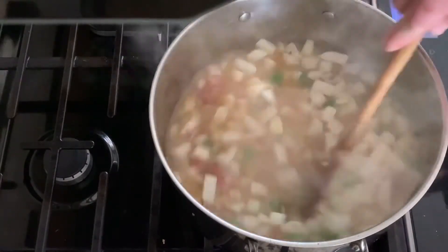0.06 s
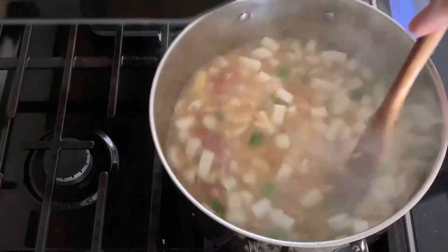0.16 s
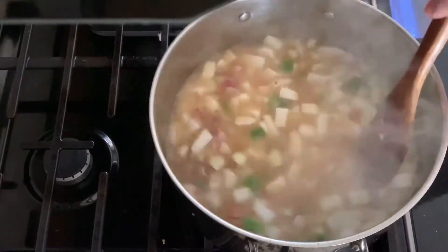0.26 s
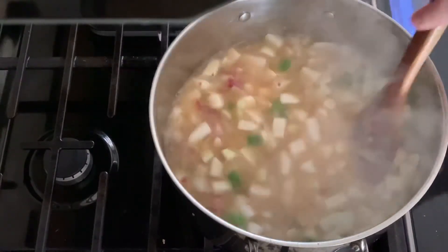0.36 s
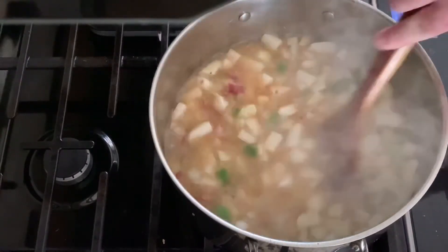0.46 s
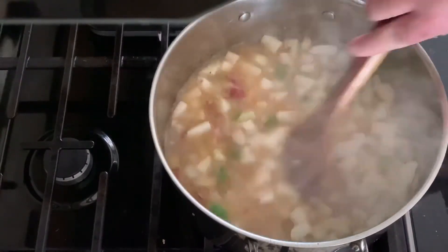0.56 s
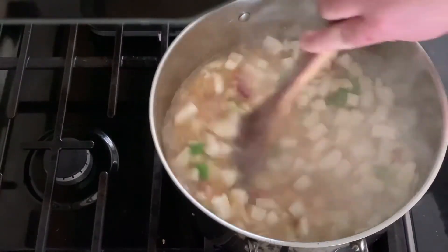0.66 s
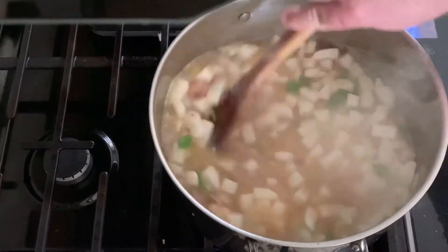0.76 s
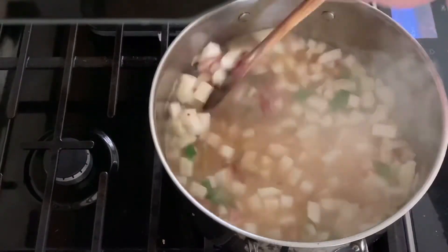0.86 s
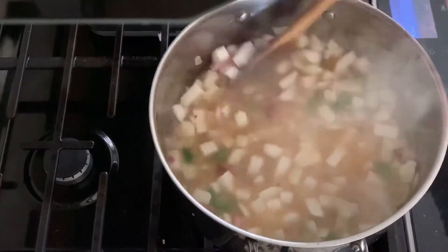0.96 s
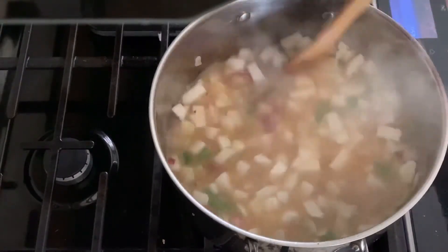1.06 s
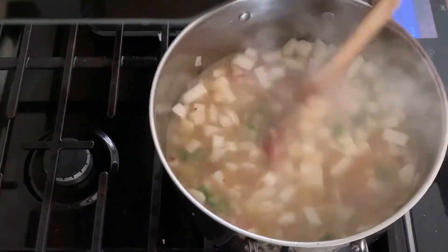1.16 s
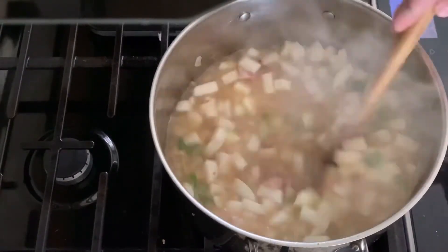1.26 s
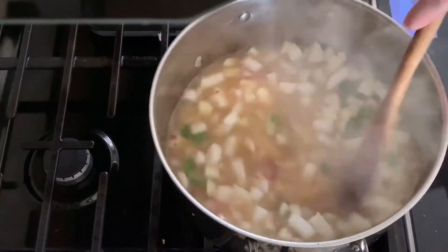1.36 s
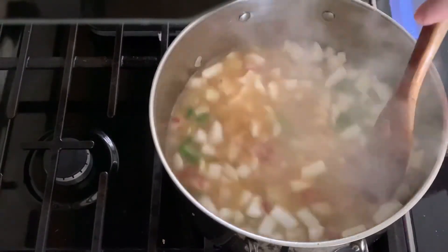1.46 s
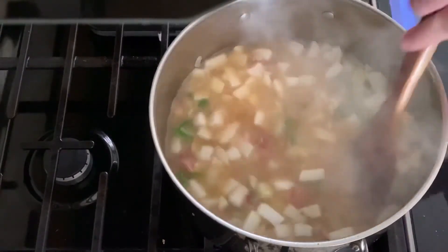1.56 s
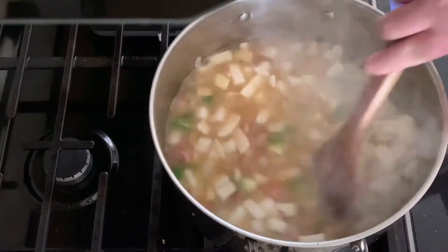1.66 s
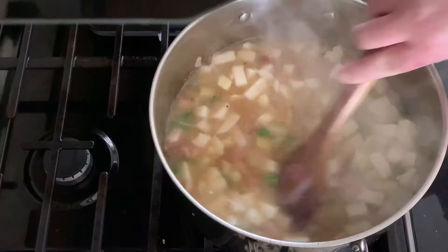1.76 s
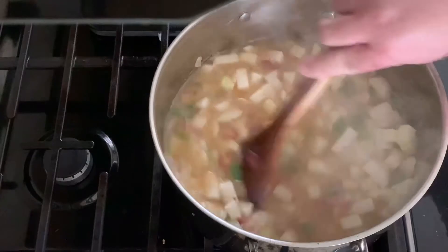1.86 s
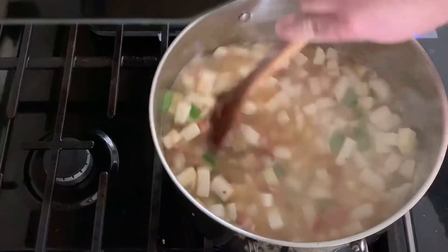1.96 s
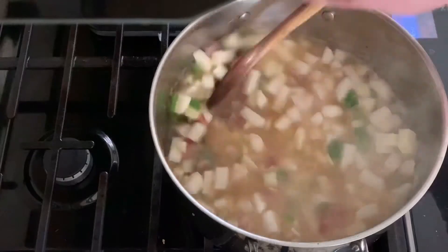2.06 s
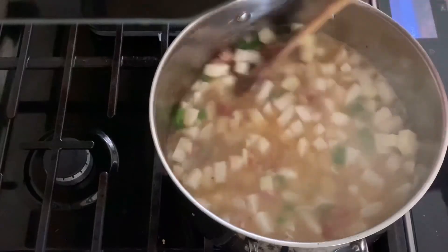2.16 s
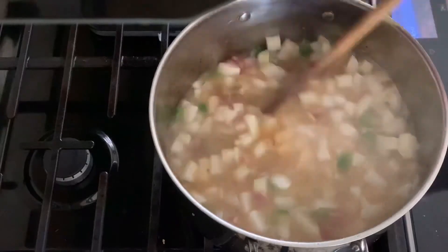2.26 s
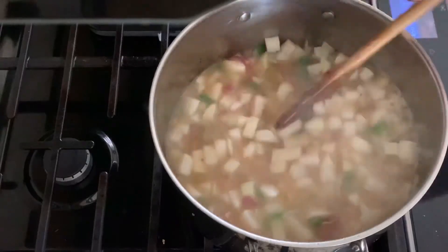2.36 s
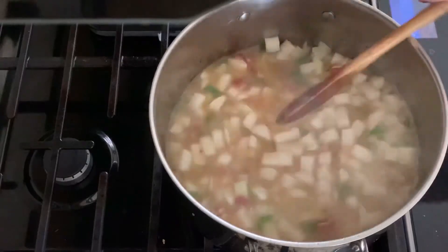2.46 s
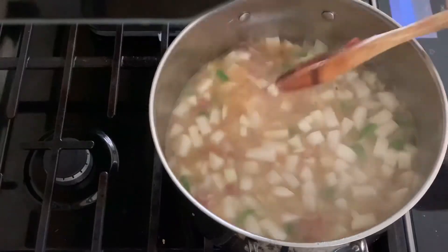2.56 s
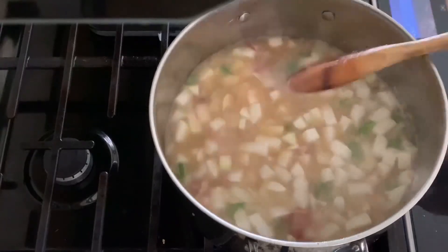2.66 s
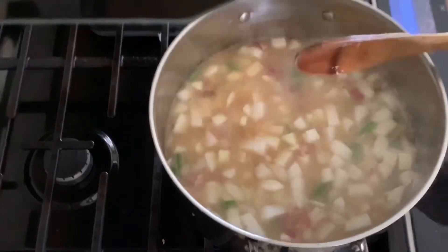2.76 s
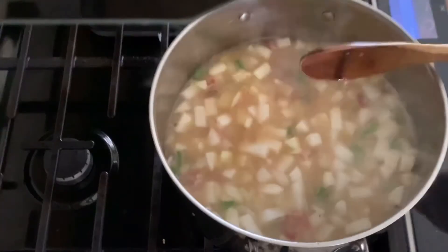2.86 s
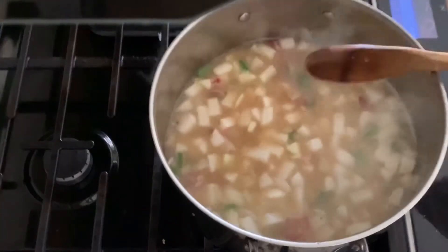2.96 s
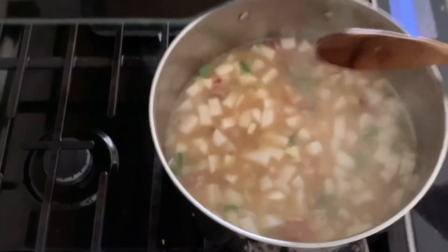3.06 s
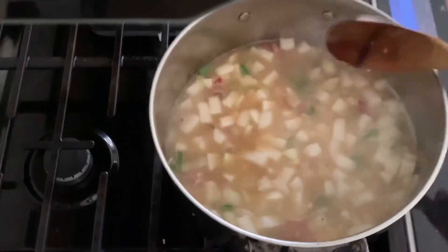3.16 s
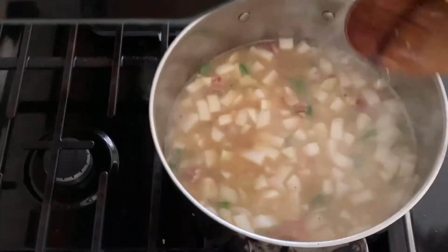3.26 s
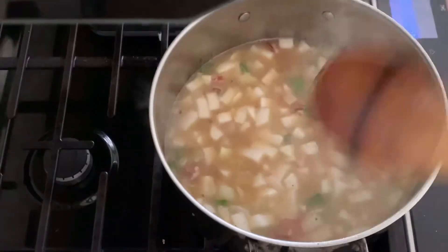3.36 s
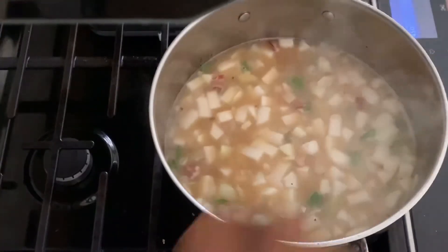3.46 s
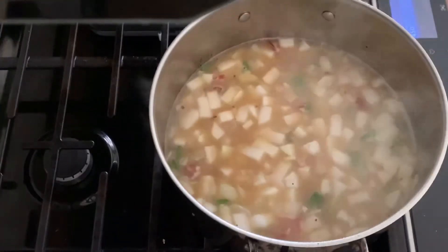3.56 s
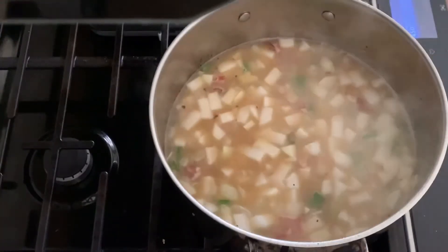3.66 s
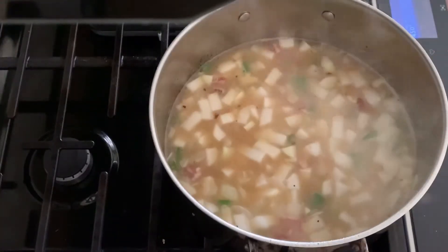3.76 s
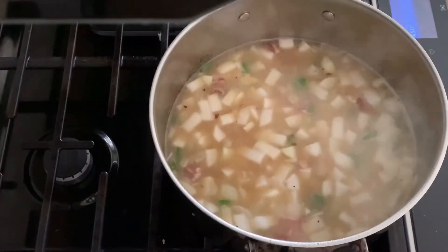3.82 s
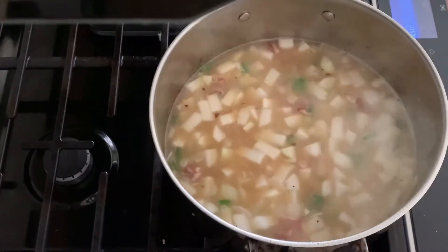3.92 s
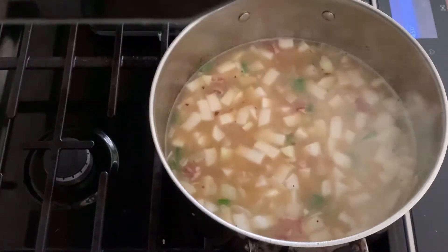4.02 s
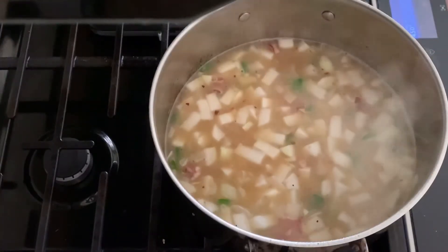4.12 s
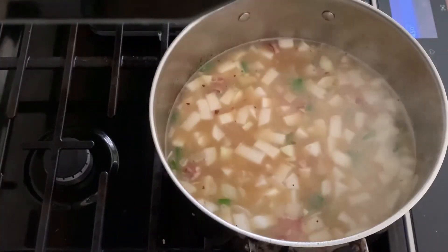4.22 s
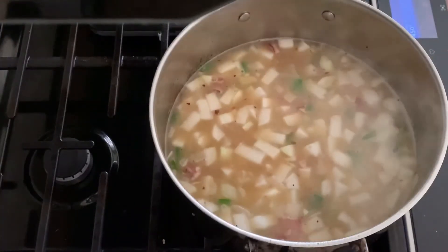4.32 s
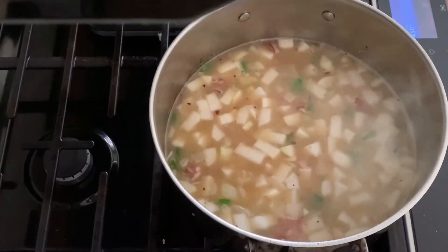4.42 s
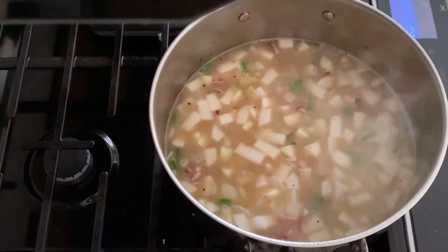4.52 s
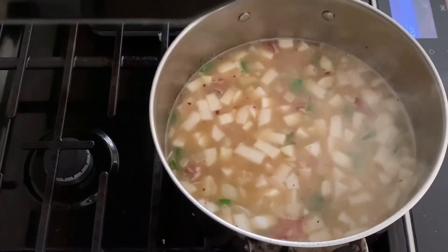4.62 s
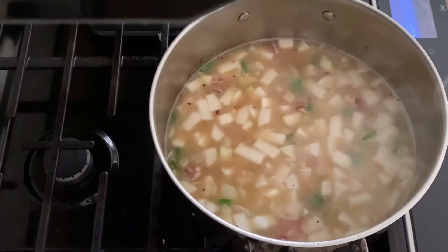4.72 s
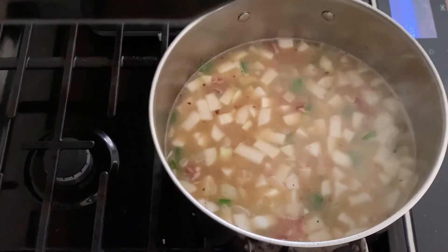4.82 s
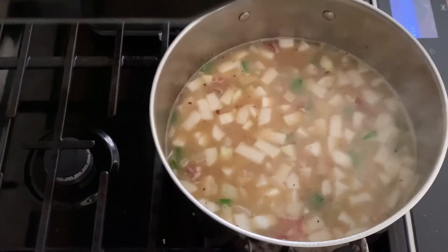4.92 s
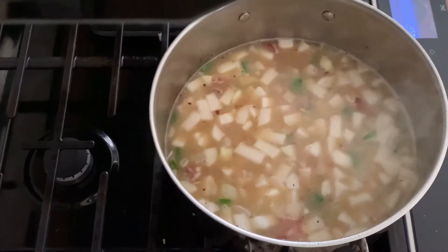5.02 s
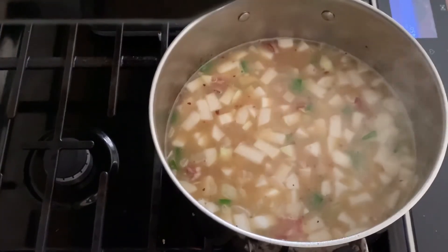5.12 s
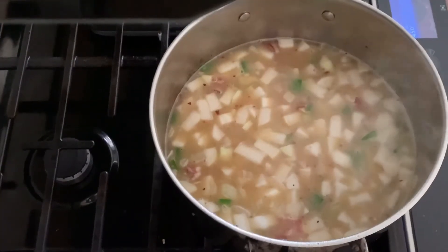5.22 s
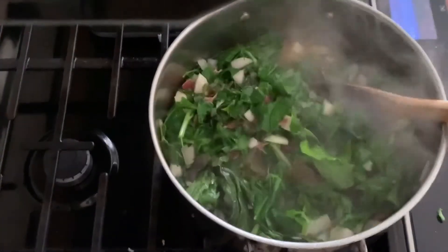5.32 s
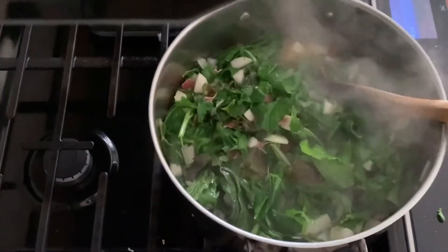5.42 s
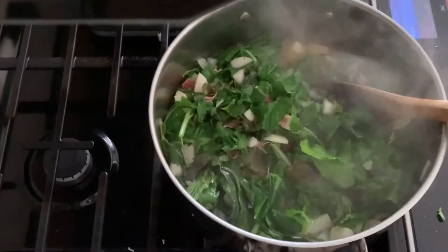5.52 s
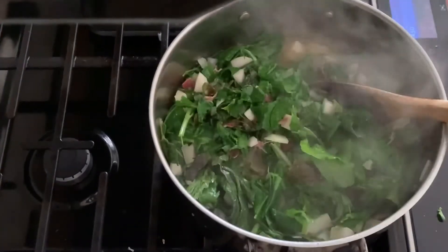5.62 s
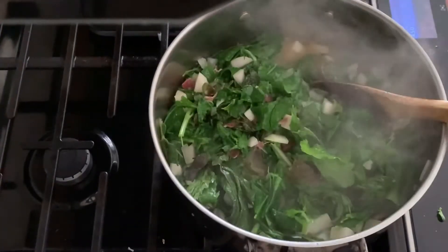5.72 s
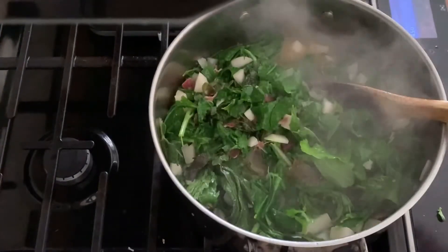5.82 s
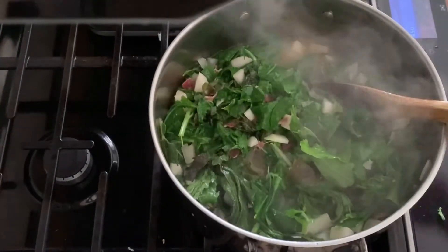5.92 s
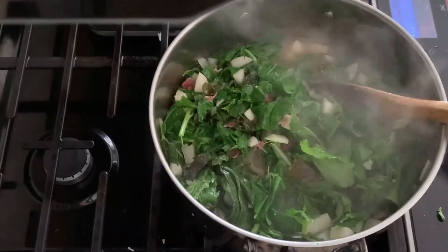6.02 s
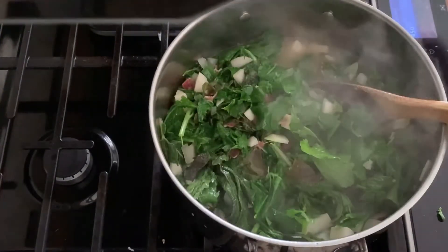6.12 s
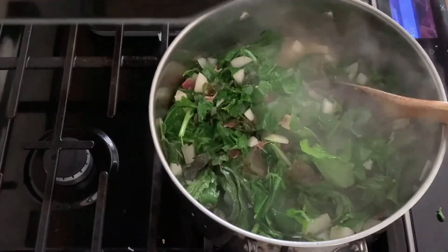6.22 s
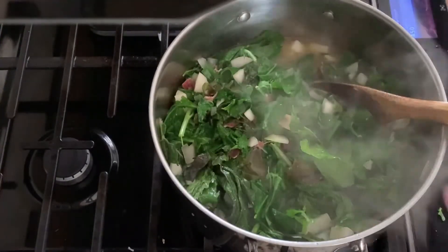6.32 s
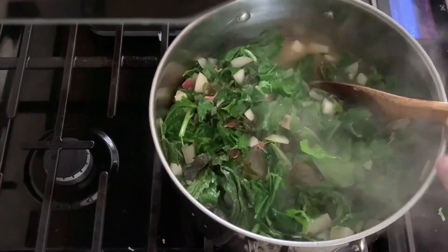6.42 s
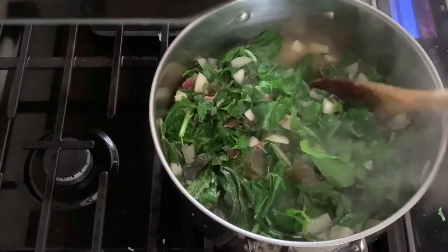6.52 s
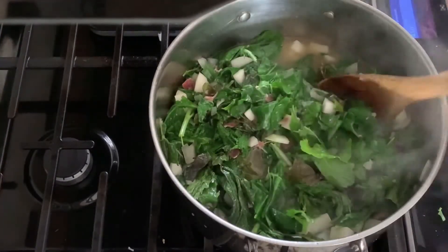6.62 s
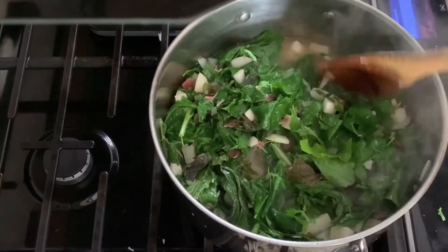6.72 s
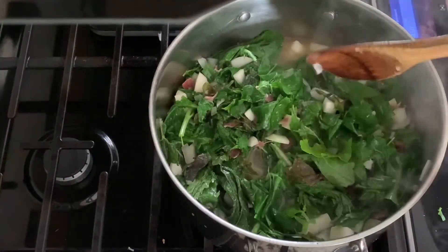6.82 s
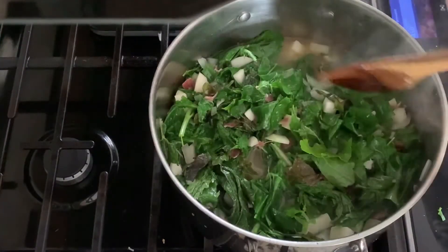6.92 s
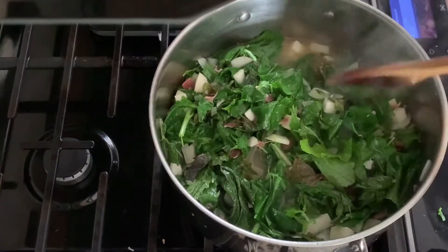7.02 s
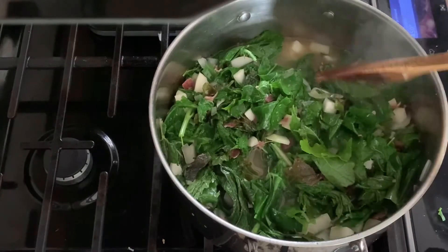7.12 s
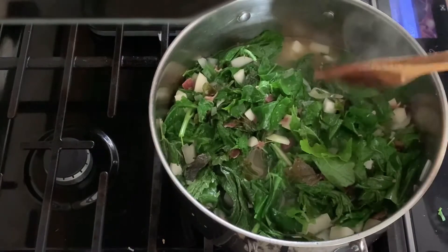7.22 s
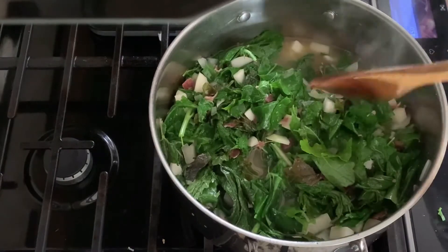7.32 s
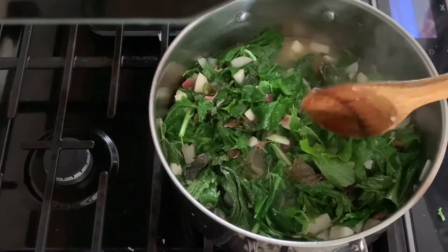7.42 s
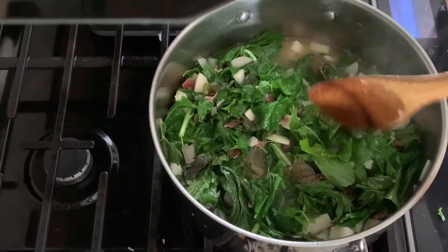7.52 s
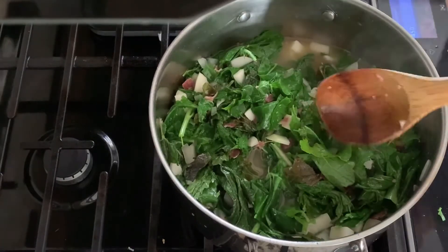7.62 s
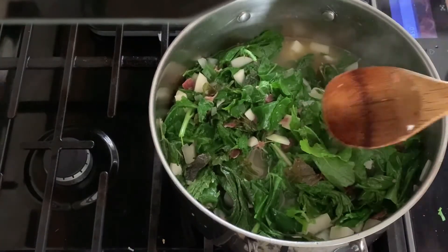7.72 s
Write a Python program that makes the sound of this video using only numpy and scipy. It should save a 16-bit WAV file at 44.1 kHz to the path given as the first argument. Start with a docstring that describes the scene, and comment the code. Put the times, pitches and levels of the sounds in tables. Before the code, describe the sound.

A small home kitchen is heard close to the stove, in stereo with little reverberation. A steady, low-heavy extractor-fan rush runs with soft bubbling, airy steam hiss and a thin, faint high whistle that slowly strengthens. A soft wet knock comes at 0.3 s, a short gritty spoon scrape at 0.7, a clearer wooden clack on the pot wall at 1.5, and a longer scrape at 1.9, with tiny spits between. From 2.6 to 3.05 s the handle raps the rim in four main blows, at 2.6, 2.75, 2.9 and 3.0; the steel pot rocks and rattles dully. At 3.84 the spoon touches a thin metal rest, then clatters brightly at 4.0 with a faint ring. Low muffled bumps follow at 4.45, 4.75 and 4.9. At 5.15 everything stops, almost silent for a tenth of a second, then fan and sizzle fade in slightly quieter; the whistle vanishes by 6.5, leaving faint fizz and spits until about 7.8.

```python
"""Stew stirred in a steel pot

Under a humming extractor fan (shaped noise) a stew simmers (ringing bubbles), hisses and spits (noise).
A wooden spoon scrapes the bottom (dense grains) and knocks the wall (damped modes). It is tapped clean
on the rim and dropped on a metal rest: struck modes plus a chatter of contacts; dull low bumps follow.
The sound stops short, nearly silent for a moment, and fades in again a little quieter."""
import sys
import numpy as np
from scipy import signal
from scipy.fft import rfft, irfft, next_fast_len
from scipy.io import wavfile

SR = 44100
rng = np.random.default_rng(int(sys.argv[2]) if len(sys.argv) > 2 else 0)


def file_out(sig):
    """Save sig as 16-bit WAV at sys.argv[1]."""
    # one column per channel
    cols = np.atleast_2d(sig).T
    # limit, then scale
    lim = np.clip(cols, -1, 1)
    pcm = np.round(lim * 32767).astype(np.int16)
    wavfile.write(sys.argv[1], SR, pcm)


N = 343098
T = np.arange(N) / SR
PADDED = next_fast_len(N)
HZ = np.maximum(np.fft.rfftfreq(PADDED, 1 / SR), 1)
BREAK_S = 5.15


def from_db(db):
    """Decibels to gain."""
    return 10 ** (np.asarray(db) / 20)


def rms_one(x):
    """Scale to rms 1."""
    return x / np.sqrt(np.mean(x ** 2) + 1e-20)


def in_time(rows):
    """A (s, dB) table as gain at every sample."""
    return from_db(np.interp(T, *np.transpose(rows)))


def at_hz(rows, hz):
    """Every column of a table read on a log-frequency axis."""
    at, *columns = np.transpose(rows)
    return [np.interp(np.log(hz), np.log(at), column) for column in columns]


def outside(start_s, stop_s):
    """Seconds away from a span of time, zero within it."""
    return np.maximum(np.maximum(start_s - T, T - stop_s), 0)


def drift(rate_hz):
    """Slow random wander of spread 1: noise through a two-pole lowpass, at a fortieth of SR."""
    r = np.exp(-80 * np.pi * rate_hz / SR)
    noise = rng.standard_normal(N // 40 + 2002)
    slow = signal.lfilter([1], [1, -2 * r, r * r], noise)[2000:]
    return np.interp(np.arange(N) / 40, np.arange(len(slow)), rms_one(slow))


def coloured(source, colour, peaks=()):
    """Shape a pair of signals by a spectrum and some resonant lifts; rms 1."""
    db = at_hz(colour, HZ)[0]
    for hz, width_hz, lift_db in peaks:
        db = db + lift_db / (1 + (2 * (HZ - hz) / width_hz) ** 2)
    return rms_one(irfft(rfft(source, PADDED) * from_db(db), PADDED)[:, :N])


def grains(per_s, spread_db):
    """Two unrelated streams of random clicks of uneven size; rms 1."""
    sizes = from_db(spread_db * np.minimum(rng.exponential(1, (2, N)), 4))
    signed = sizes * rng.choice([-1, 1], (2, N))
    return rms_one(signed * (rng.random((2, N)) < per_s / SR))


def ring(clicks, hz, t60_s):
    """Two-pole resonator: a unit click sets a sine of height 1 ringing."""
    r, w = from_db(-60 / (t60_s * SR)), 2 * np.pi * hz / SR
    return signal.lfilter([0, np.sin(w)], [1, -2 * r * np.cos(w), r * r], clicks + 1e-18)


def clicks_at(rows):
    """One click per row, at its start and level (first two columns)."""
    out = np.full(N, 1e-18)
    out[[round(row[0] * SR) for row in rows]] = from_db([row[1] for row in rows])
    return out


TWIN_SPLIT, TWIN_DB = .004, -8   # largest pitch share, relative level


def chatter(rows, body, modes, per_s, spread_db, lag_s, rise_s, slow_s, shrink):
    """Dense uneven contacts swell, hold and die band by band and drive the modes of the body."""
    start = round((rows[0][0] - .01) * SR)
    stop = round((rows[-1][0] + .7) * SR)
    contacts = coloured(grains(per_s, spread_db), body)[:, start:stop]
    rattle, out = np.zeros((2, stop - start)), np.zeros((2, N))
    for low_hz in 40 * 2 ** np.arange(0, 8.6, .5):
        half_octave = signal.butter(2, [low_hz, low_hz * 2 ** .5], "band", fs=SR, output="sos")
        band = signal.sosfilt(half_octave, contacts)
        t60_s, octaves = at_hz(body, 1.2 * low_hz)[1], np.log2(low_hz / 1000)
        # highs come in after a gap, lows build up late
        gap_s = lag_s * np.clip(octaves, 0, 1)
        swell_s = rise_s + slow_s * (100 / low_hz) ** 2
        for s, _, level_db, length_s, bright_db, *_ in rows:
            at = round(s * SR) - start
            t = np.arange(min(round((length_s + 1.2 * t60_s) * SR), stop - start - at)) / SR
            swell = np.clip((t - gap_s) / swell_s, 0, 1) ** 2
            hold_s = length_s * shrink ** octaves   # highs let go first
            fall_db = 60 * np.maximum(t - hold_s, 0) / t60_s
            gain = swell * from_db(level_db + bright_db * octaves - fall_db)
            rattle[:, at:at + len(t)] += band[:, at:at + len(t)] * gain
    # each mode beats with a weaker, slightly higher twin
    twins = [(hz * (1 + TWIN_SPLIT * rng.uniform(.4, 1)), db + TWIN_DB, t60_s) for hz, db, t60_s in modes]
    top = 2 * np.log(1000) / SR   # over t60, brings a mode's top gain to 1
    answer = sum(from_db(db) * top / t60_s * ring(rattle, hz, t60_s) for hz, db, t60_s in modes + twins)
    out[:, start:stop] = rattle + answer
    return out


BUBBLES_PER_S, BUBBLE_CYCLES = 300, 22


def simmer():
    """Bubbles burst at random, in bunches, each ringing a few cycles at one of ten pitches."""
    born = grains(BUBBLES_PER_S, spread_db=2.0)[0] * from_db(3.0 * drift(3.0))
    dealt = rng.integers(0, 10, N)
    pitches_hz = np.geomspace(300, 1900, 10)
    return rms_one(sum(ring(born * (dealt == k), hz, BUBBLE_CYCLES / hz) for k, hz in enumerate(pitches_hz)))


# Extractor fan and flame, one row before and one after the break.
# Each row: level at the break in dB, creep in dB per s.
FAN = [(-36, 0.0), (-40.5, 1.48)]
# Rush spectrum. Each row: frequency in Hz, relative density in dB per Hz.
FAN_COLOUR = [(25, -35.5), (40, -6), (55, -6), (80, 1.5), (115, 3), (148, -9), (185, -2), (260, -6),
              (360, -2.5), (450, -7.5), (560, -2.5), (900, -16.5), (1280, -22), (1900, -25), (2600, -21.5),
              (4000, -26.5), (5500, -39), (9000, -63.5)]
# Duct resonances. Each row: frequency in Hz, width in Hz, lift in dB.
HOOD = [(777.5, 36, 10), (1068, 145, 10), (1519, 66, 9), (1832, 510, 12)]
SIMMER_DB = -15.5   # against the rush


def fan():
    """Broad rush: noise shaped by the hood, wavering a little, with the simmer under it."""
    rush = coloured(rng.standard_normal((2, N)), FAN_COLOUR, HOOD) + from_db(SIMMER_DB) * simmer()
    before, after = [db + creep * (T - BREAK_S) for db, creep in FAN]
    return from_db(np.where(T < BREAK_S, before, after) + 1.05 * drift(3.5)) * rush


# Thin whistle of the gas jet. Each row: time in seconds, level in dB.
WHISTLE = [(0, -57.5), (1.5, -57), (4.0, -51.5), (5.15, -49.5), (5.25, -57), (6.0, -60.5), (6.5, -84)]
WHISTLE_HZ, WHISTLE_WIDTH_HZ, WHISTLE_WANDER_HZ = 1972, 16, 3.5
WHISTLE_STEADY_DB = 12   # tone over blur


def whistle():
    """A thin tone that strays a little in pitch, with a faint blur of narrow noise."""
    t60_s = 2.2 / WHISTLE_WIDTH_HZ
    narrow = ring(rng.standard_normal(N), WHISTLE_HZ, t60_s)
    blur = rms_one(ring(narrow, WHISTLE_HZ, t60_s))
    phase = 2 * np.pi * np.cumsum(WHISTLE_HZ + WHISTLE_WANDER_HZ * drift(2)) / SR
    tone = rms_one(np.sin(phase))
    return in_time(WHISTLE) * rms_one(blur + from_db(WHISTLE_STEADY_DB) * tone)


# Faint bright fizz while the stew is moving.
# Each row: start in seconds, stop in seconds, fizz level in dB, steam level shift in dB.
FIZZ = [(0, 2.6, -63, -2.5), (3.0, 5.1, -67.5, -0.5), (6.5, 6.82, -68, 2.5), (7.0, 7.78, -74, 0)]
FIZZ_DB_PER_S, STEAM_EDGE_S = 77.5, .1   # slopes outside each span


def fizz_gain():
    """Gain of the stirred stew's fizz, sloping in and out of each span."""
    return sum(from_db(db - FIZZ_DB_PER_S * outside(start, stop)) for start, stop, db, _ in FIZZ)


def steam_shift_db():
    """Steam level shift while the stew is moving."""
    return sum(db * np.clip(1 - outside(start, stop) / STEAM_EDGE_S, 0, 1) for start, stop, _, db in FIZZ)


# Steam and fine sizzle. Each row: time in seconds, level in dB before shift and flicker.
STEAM = [(0, -55.5), (4.3, -55.5), (5.15, -57), (5.3, -61.5), (7.78, -59)]
# Hiss spectrum. Each row: frequency in Hz, relative density in dB per Hz.
STEAM_COLOUR = [(2500, -29), (4500, 3), (6800, 2.5), (8500, -3), (9500, -12), (12000, -16), (14000, -29.5),
                (16500, -30.5)]


def steam():
    """Smooth noise hiss with a fine sizzle of grains; its level flickers and shifts with the fizz."""
    source = rng.standard_normal((2, N)) + from_db(-5.0) * grains(900, spread_db=-4.0)
    level = in_time(STEAM) * from_db(steam_shift_db() + 0.59 * drift(11.0))
    return level * coloured(source, STEAM_COLOUR)


BITE_DB, LEAD_DB_PER_S, LIFT_DB_PER_S = -0.5, 396, 169   # at the bite, approach slope, lift-off slope
WAKE_DB, WAKE_DB_PER_S = -8.5, 55   # start below full level, fall


def stroke(bite_s, swell_s, hold_s, db):
    """Gain as the spoon nears, bites, presses harder, holds and lifts off, leaving a seething wake."""
    since_lift = np.maximum(T - bite_s - swell_s - hold_s, 0)
    press_db = BITE_DB * np.clip(1 - (T - bite_s) / swell_s, 0, 1)
    lead_db = -LEAD_DB_PER_S * np.maximum(bite_s - T, 0)
    fall_db = np.maximum(-LIFT_DB_PER_S * since_lift, WAKE_DB - WAKE_DB_PER_S * since_lift)
    return from_db(db + press_db + lead_db + fall_db)


# Spoon dragged over the bottom.
# Each row: bite in seconds, swell in seconds, hold in seconds, level in dB before flicker.
SCRAPES = [(0.718, 0.048, .01, -33), (1.862, 0.079, 0.082, -34.5)]
# Scrape spectrum. Each row: frequency in Hz, relative density in dB per Hz.
SCRAPE_COLOUR = [(900, -17), (2300, -2.5), (3500, -6.5), (5000, -13.5), (6500, -2.5), (8600, -5.5),
                 (10500, -3.5), (12500, -8), (14500, -5), (16500, -13.5)]
# Answer of the steel. Each row: frequency in Hz, width in Hz, lift in dB.
SCRAPE_PEAKS = [(8700, 500, 5.5), (6900, 380, -4.5), (4400, 480, 8)]


def scrapes():
    """Dense tiny slips of wet wood on steel, over the fizz of the stirred stew."""
    strokes = sum(stroke(*row) for row in SCRAPES) * from_db(1.6 * drift(25) + .8 * drift(120))
    slips = coloured(grains(9000, spread_db=3.0), SCRAPE_COLOUR, SCRAPE_PEAKS)
    return np.maximum(strokes, fizz_gain()) * slips


# Spoon bowl against the wet wall.
# Each row: start in seconds, click level in dB, brightness in dB per octave, multiple of the wall's t60.
KNOCKS = [(0.3025, -33.5, -2, 1.9), (1.4827, -23, -0.2, 0.6), (1.4903, -40.5, 15, 0.6)]
# Wall modes. Each row: frequency in Hz, relative level in dB, t60 in seconds before that multiple.
WALL = [(572, 4, 0.16), (632, 13, 0.035), (900, 6, 0.0091), (1185, -2, 0.068), (1350, -9, 0.0076),
        (1576, 4.5, 0.025), (1870, 11, 0.031), (2110, 0, 0.011), (2365, -9.5, 0.098)]


def knocks():
    """Soft wet blows excite the stew-damped wall modes to a short wooden clack."""
    soft = signal.butter(6, [400, 2500], "band", fs=SR, output="sos")
    out = 0
    for row in KNOCKS:
        _, _, bright_db, stretch = row
        blow = signal.sosfilt(soft, clicks_at([row]))
        for k, (hz, db, t60_s) in enumerate(WALL):
            gain = from_db(db + bright_db * np.log2(hz / 1000)) * (-1) ** k
            out = out + gain * ring(blow, hz, t60_s * stretch)
    return out


# Droplets bursting. Each row: start in seconds, relative level in dB, pitch in Hz.
SPITS = [(0.3803, -42, 8300), (0.4688, -44, 6340), (0.532, -45, 8080), (0.873, -33.5, 8700),
         (1.1073, -39.5, 9100), (1.3164, -47, 8260), (1.8637, -39, 8600), (2.1635, -52, 8770),
         (5.9194, -57, 7620), (7.3946, -49, 6410)]


def spits():
    """Each droplet is a few milliseconds of bright noise, strongest near its pitch."""
    out, t = np.zeros((2, N)), np.arange(round(.02 * SR)) / SR
    for s, db, hz in SPITS:
        puff = rng.standard_normal((2, len(t))) * np.exp(-t / 0.0034)
        bright = np.diff(puff, prepend=0) * from_db(-3.0)
        pitched = ring(puff, hz, 0.0019) * from_db(-7.5)
        at = round(s * SR)
        out[:, at:at + len(t)] += from_db(db) * (bright + pitched)
    return out


# Dull bumps carried through the stove, most as the tapped pot rocks.
# Each row: start in seconds, relative level in dB, starting pitch in Hz, t60 in seconds.
BUMPS = [(2.251, -26.5, 175.5, 0.55), (2.592, -22, 275, 0.16), (2.618, -21.5, 221.5, 0.2),
         (2.65, -31, 168, 0.25), (2.668, -27, 118, 0.34), (2.692, -21.5, 210, 0.19), (2.756, -27, 260, .13),
         (2.768, -23.5, 180, .15), (2.805, -32, 207, .15), (2.832, -26.5, 121.7, 0.59),
         (2.849, -29, 228, .15), (2.909, -25, 273, .13), (2.935, -23, 172, 0.16), (2.966, -23.5, 227, 0.18),
         (3.045, -21, 188, 0.21), (3.024, -27, 291, .15), (3.058, -21.5, 102, 0.3),
         (3.071, -28.5, 222, 0.22), (3.11, -26.5, 120.3, 0.4), (4.459, -17.5, 74, 0.073),
         (4.744, -27.5, 103, 0.23), (4.774, -26, 65, 0.11), (4.931, -31, 80.3, 0.088)]
SAG_SHARE, BUMP_RISE_CYCLES, BUMP_ROUGH_DB = .08, .7, 2.0   # pitch lost by t60, onset, shudder spread


def bumps():
    """Soft low sines that swell, shudder, sag in pitch and die."""
    out = np.zeros(N)
    for s, db, hz, t60_s in BUMPS:
        t = np.arange(round(t60_s * SR)) / SR
        swell = 1 - np.exp(-t * hz / BUMP_RISE_CYCLES)
        push = swell * np.sin(2 * np.pi * hz * t * (1 - SAG_SHARE * t / t60_s / 2))
        at = round(s * SR)
        out[at:at + len(t)] += from_db(db - 60 * t / t60_s) * push
    return out * from_db(BUMP_ROUGH_DB * drift(30))


# Handle tapped on the rim. Each row: start in seconds, pock click level in dB, chatter level in dB,
# chatter length in seconds, chatter brightness in dB per octave, crack level in dB.
TAPS = [(2.5853, -17.5, -16, 0.033, 0.5, -31.5), (2.598, -34.5, -33.5, .01, -1, -32.5),
        (2.613, -25, -26.5, 0.012, 1, -40), (2.7508, -16.5, -14.5, 0.03, 2.5, -24.5),
        (2.765, -30, -30.5, .01, -5.5, -28.5), (2.905, -15, -21.5, 0.039, -1, -27.5),
        (2.999, -31, -43, 0.013, 2.5, -45), (3.019, -11.5, -18, 0.04, -0.35, -21.5),
        (3.042, -28.5, -34.5, .02, 0.5, -35.5)]
# Handle modes, the pock. Each row: frequency in Hz, relative level in dB, t60 in seconds.
HANDLE = [(291, -0.5, 0.19), (561, -5, 0.1), (675, 8, 0.011)]
# Pot on grate. Each row: frequency in Hz, relative density in dB per Hz, t60 in seconds.
POT = [(30, -21.5, .5), (60, -8.5, 0.32), (122, -18, 0.5), (213.5, -7, 0.36), (408, -13, 0.4),
       (590, -13.5, 0.34), (1050, -5.5, 0.14), (1600, -13.5, 0.18), (2450, -17, 0.2), (3530, -23.5, 0.22),
       (5170, -32.5, 0.18), (6450, -24, 0.14), (9100, -45, 0.17), (15000, -46, 0.044)]
# Pot modes. Each row: frequency in Hz, lift in dB, t60 in seconds.
POT_PEAKS = [(118, 12, 0.43), (179, -1, 0.43), (229, 2, 0.12), (250, -3, 0.076), (291, 7, 0.13),
             (369, 2, 0.079), (547, 4, 0.13), (613, -1, 0.054), (680, 4, 0.022), (1000, -5, 0.031),
             (1160, -2, 0.031), (1554, 2, 0.1), (1890, -2, 0.02), (2454, -5.5, 0.045)]
CRACK_CUT_HZ = 8800   # wood on steel has no extreme treble
CRACK_HZ, CRACK_T60_S, CRACK_RING_DB = 6610, 0.0029, -6.5   # the rim's bright tick


def taps():
    """The handle gives a short pock with a crack; the pot rocks and chatters on the grate."""
    dull = signal.butter(2, [300, 1100], "band", fs=SR, output="sos")
    blows = signal.sosfilt(dull, clicks_at(TAPS))
    pock = sum(from_db(db) * ring(blows, hz, t60_s) for hz, db, t60_s in HANDLE)
    fade = np.exp(-1 / (.0015 * SR))
    bursts = signal.lfilter([1], [1, -fade], clicks_at([(row[0], row[5]) for row in TAPS]))
    noise = bursts * rng.standard_normal((2, N))
    crack = signal.lfilter(*signal.butter(2, CRACK_CUT_HZ, fs=SR), noise)
    crack = crack + from_db(CRACK_RING_DB) * ring(noise, CRACK_HZ, CRACK_T60_S)
    return pock + crack + chatter(TAPS, POT, POT_PEAKS, 2200, spread_db=4.5, lag_s=0.0079,
                                  rise_s=0.0044, slow_s=0.077, shrink=0.9)


# Spoon dropped on its rest. Each row: start in seconds, clack click level in dB, chatter level in dB,
# chatter length in seconds, chatter brightness in dB per octave.
DROPS = [(3.830, -59.5, -38.5, .005, 1), (3.8365, -29.5, -20.5, 0.0036, -7),
         (3.8395, -37, -26.5, 0.008, -5), (3.845, -38, -29.5, 0.0035, 0.5), (3.987, -27, -9, 0.015, -0.5),
         (4.006, -25.5, -12, 0.027, -0.06), (4.018, -29, -25.5, 0.012, 2), (4.029, -39, -31.5, 0.006, 7),
         (4.045, -53, -35, 0.037, 0.5), (4.067, -34, -38, 0.008, 1), (4.08, -40.5, -30, 0.007, 0.5)]
# Spoon modes. Each row: frequency in Hz, relative level in dB, t60 in seconds.
SPOON = [(363, -3.5, 0.067), (583, -8.5, .04), (1140, 9.5, 0.0073), (1485, 1.5, .01), (1843, 7.5, 0.031),
         (2300, 11, 0.0051)]
# Chatter on the rest. Each row: frequency in Hz, relative density in dB per Hz, t60 in seconds.
REST = [(300, -39, 0.081), (590, -2.5, 0.041), (1010, -12.5, 0.046), (1925, -11.5, 0.034),
        (2780, -5.5, 0.035), (4230, -7, 0.07), (6200, -1.5, 0.035), (8600, -6, 0.044), (9970, 4, .03),
        (13400, -9, 0.014), (14300, -2, .04), (15250, -20, .04), (15900, -34, 0.037)]
# Rest modes. Each row: frequency in Hz, lift in dB, t60 in seconds.
REST_PEAKS = [(1825, 11, .05), (2050, 9, .03), (2350, 6, .02), (3440, 7, .02), (3628, 6, .2),
              (4296, 0, .15), (4958, 11, .22), (6385, 13, .03), (6638, 14, .4), (6950, 3, .12),
              (7375, 2, .35), (8073, 16, .55), (8180, 10, .03), (8620, 6, .33), (8630, 11, .035),
              (9130, 0, .15), (9530, 5, .35), (10070, 0, .2), (10320, 0, .15), (10640, -2, .25),
              (11170, 2, .2), (14300, 13, .17), (15130, 11, .17)]


def drops():
    """The spoon clacks and rattles on thin metal, which rings on faintly."""
    blows = clicks_at(DROPS)
    clack = sum(from_db(db) * (-1) ** k * ring(blows, hz, t60_s) for k, (hz, db, t60_s) in enumerate(SPOON))
    return clack + chatter(DROPS, REST, REST_PEAKS, 6000, spread_db=0.0, lag_s=0.0001,
                           rise_s=0.00055, slow_s=0.033, shrink=0.85)


# Room decay. Each row: frequency in Hz, t60 in seconds.
KITCHEN = [(100, 0.9), (500, 0.12), (2000, 0.37), (8000, 0.14), (15000, 0.05)]


def kitchen(x):
    """Two unrelated reverberant tails: octave bands of noise, each dying at its own rate."""
    t, tails = np.arange(round(.5 * SR)) / SR, 0
    for low_hz in 60 * 2. ** np.arange(8):
        octave = signal.butter(2, [low_hz, 2 * low_hz], "band", fs=SR, output="sos")
        band = signal.sosfilt(octave, rng.standard_normal((2, len(t))))
        tails = tails + band * from_db(-60 * t / at_hz(KITCHEN, 1.4 * low_hz)[0])
    tails = tails * np.minimum(t / 0.0013, 1)   # first reflections build up
    tails = tails / np.sqrt(np.sum(tails ** 2) / 2)
    return signal.fftconvolve(x[None], tails, axes=1)[:, :N]


# Two microphone ports.
# Each row: frequency in Hz, likeness 0-1, left phase lead in rad, left minus right in dB.
PORTS = [(40, .95, -.2, 0), (110, .99, -.2, -1.6), (250, .98, -.2, -3.4), (400, .9, -.35, -7),
         (600, .55, .15, -10.5), (900, .55, .25, -4), (1300, .5, .2, -.7), (1700, .75, .6, -1.2),
         (2200, .4, 1.2, -1.5), (3000, .42, 2.1, -1), (4000, .5, 1.2, 0), (5100, .75, 3.1, 0),
         (6500, .75, 4.8, .3), (8000, .97, 6.2, 0), (9400, .97, 6.4, 0), (10500, .6, 7.8, 0),
         (11700, .998, 9.42, 0), (13400, .998, 9.42, 0), (14500, .55, 11, 0), (15600, .95, 12.5, 0)]


def ports(field):
    """The left port hears part of what the right hears, shifted in phase, and part of its own."""
    alike, lead_rad, balance_db = at_hz(PORTS, HZ)
    alike = np.clip(alike, 0, 1)
    shared, own = rfft(field, PADDED)
    left = alike * np.exp(1j * lead_rad) * shared + np.sqrt(1 - alike ** 2) * own
    return irfft(np.array([left * from_db(balance_db), shared]), PADDED)[:, :N]


WALL_ROOM_DB, POT_ROOM_DB, REST_ROOM_DB = -12.5, -8.5, -16   # damped wall, pot, nearer rest


def scene():
    """All sources, the room and the two ports."""
    wall, pot, rest = knocks(), taps(), drops()
    sent = from_db(WALL_ROOM_DB) * wall + from_db(POT_ROOM_DB) * pot[0] + from_db(REST_ROOM_DB) * rest[0]
    steady = fan() + whistle() + steam()
    events = scrapes() + wall + spits() + bumps() + pot + rest
    return ports(steady + events + kitchen(sent))


PRE_DIP_S, PRE_DIP_DB = 0.06, -6   # sag just before the stop
DROP_DB, TAIL_T60_S, SILENCE_DB = -26, .055, -60   # at once to a faint dying tail, then the floor
SILENT_UNTIL_S, FADE_IN_S, FADE_CURVE = 5.242, 0.16, 1.36   # curve is a power
PEAK_TOP, CUTOFF_HZ = .75, 16200


def record(dry):
    """The sound sags, breaks off and fades in again; tanh rounds the peaks, a lowpass cuts the top."""
    sag_db = PRE_DIP_DB * np.clip(1 - (BREAK_S - T) / PRE_DIP_S, 0, 1)
    tail_db = DROP_DB - 60 * (T - BREAK_S) / TAIL_T60_S
    stop = from_db(np.where(T < BREAK_S, sag_db, tail_db))
    fade_in = np.clip((T - SILENT_UNTIL_S) / FADE_IN_S, 0, 1) ** FADE_CURVE
    gain = np.maximum(np.maximum(stop, fade_in), from_db(SILENCE_DB))
    rounded = PEAK_TOP * np.tanh(dry / PEAK_TOP)
    return signal.sosfilt(signal.cheby2(24, 70, CUTOFF_HZ, fs=SR, output="sos"), rounded * gain)


dry = scene()
out = record(dry)
file_out(out)
```